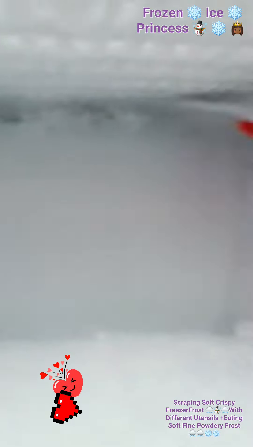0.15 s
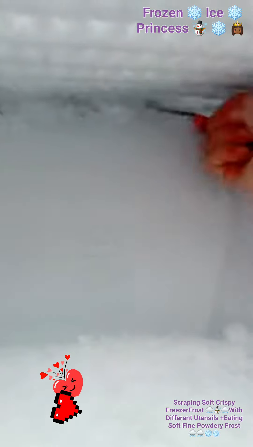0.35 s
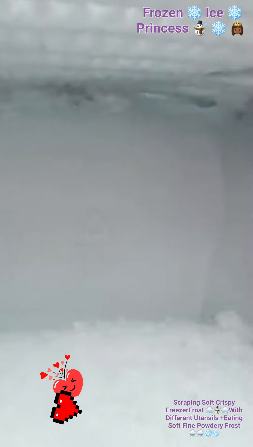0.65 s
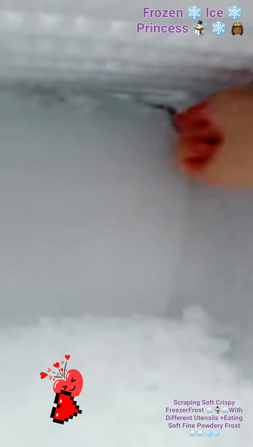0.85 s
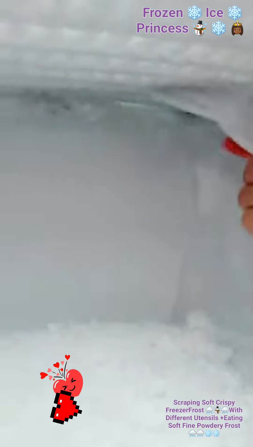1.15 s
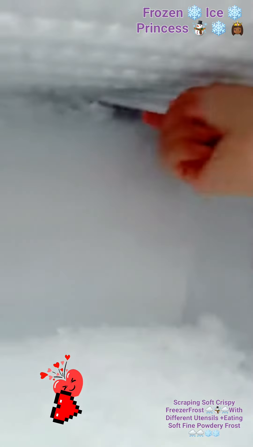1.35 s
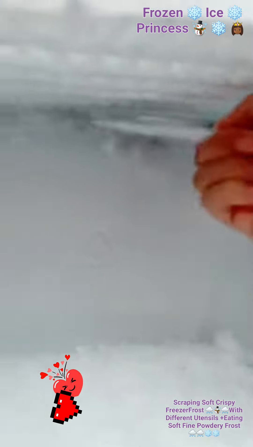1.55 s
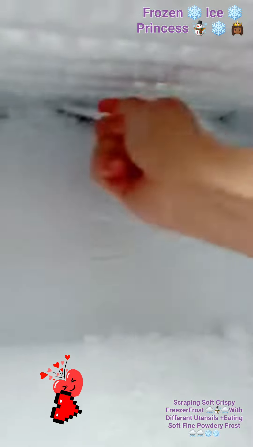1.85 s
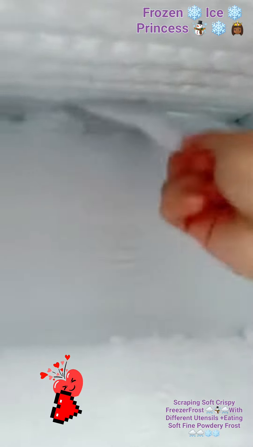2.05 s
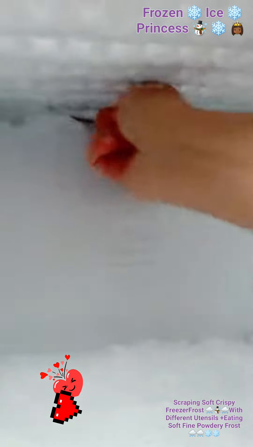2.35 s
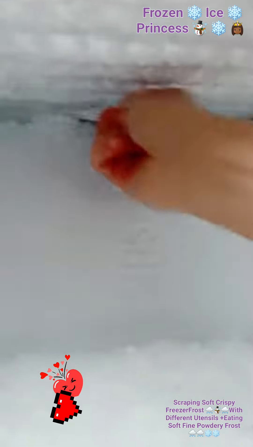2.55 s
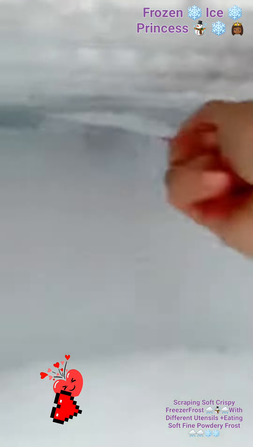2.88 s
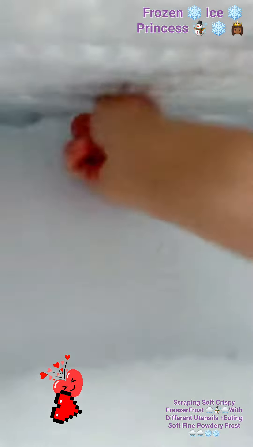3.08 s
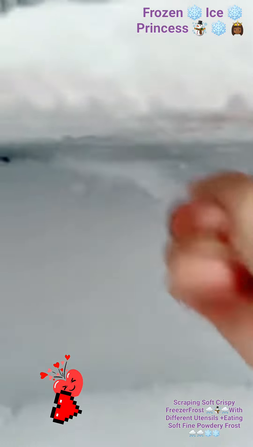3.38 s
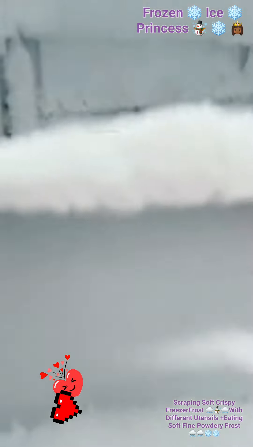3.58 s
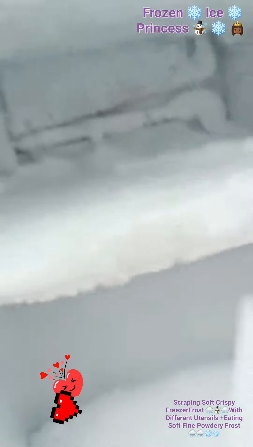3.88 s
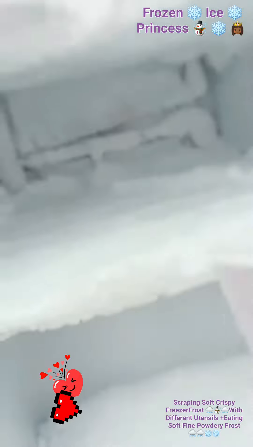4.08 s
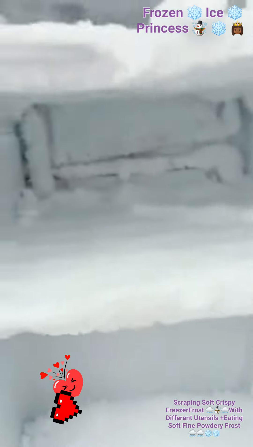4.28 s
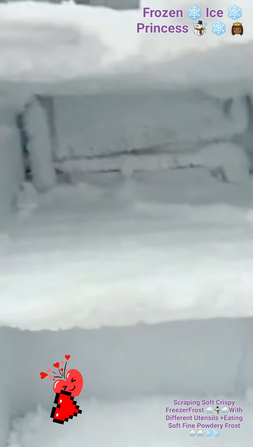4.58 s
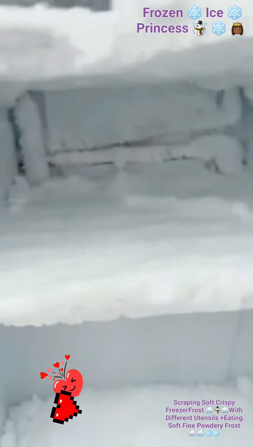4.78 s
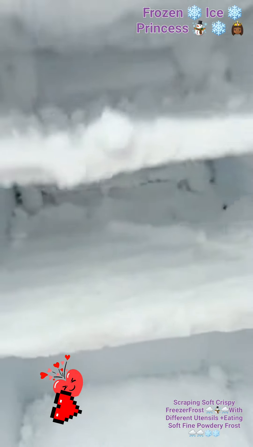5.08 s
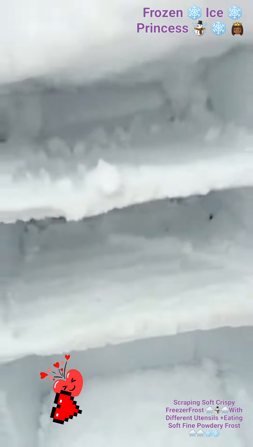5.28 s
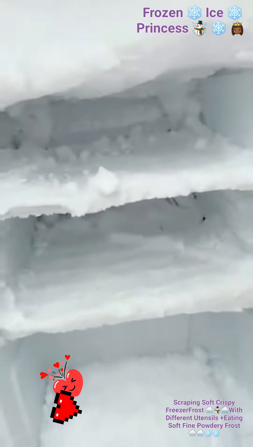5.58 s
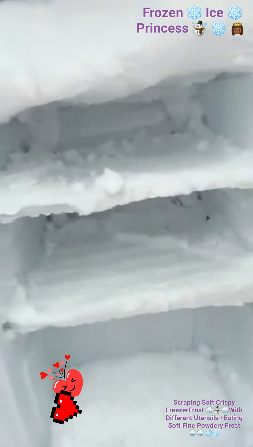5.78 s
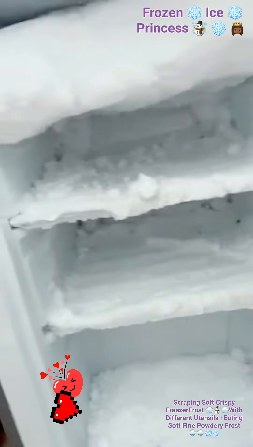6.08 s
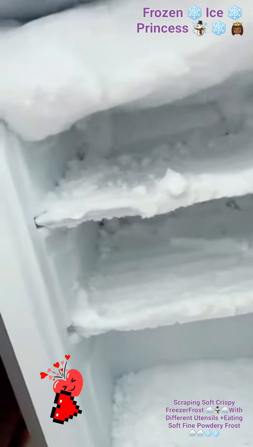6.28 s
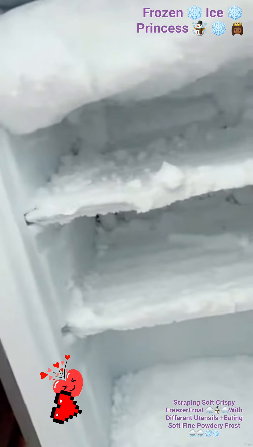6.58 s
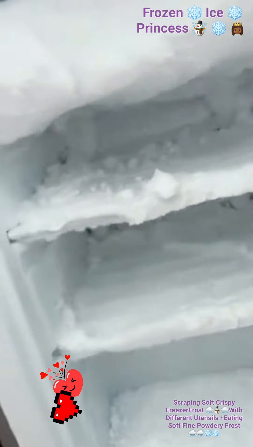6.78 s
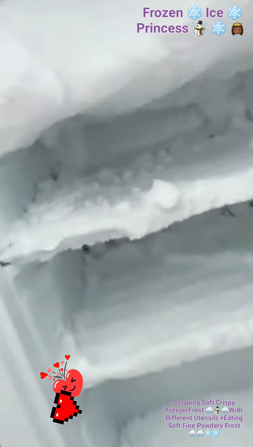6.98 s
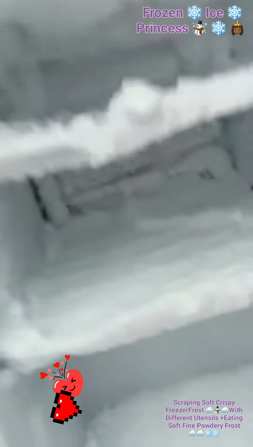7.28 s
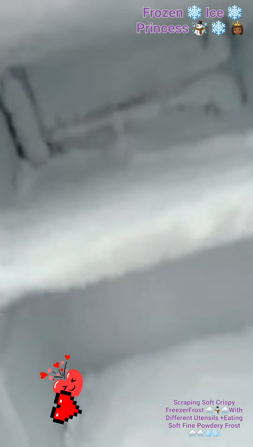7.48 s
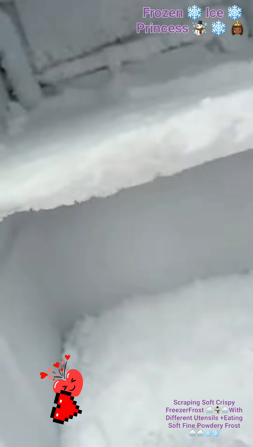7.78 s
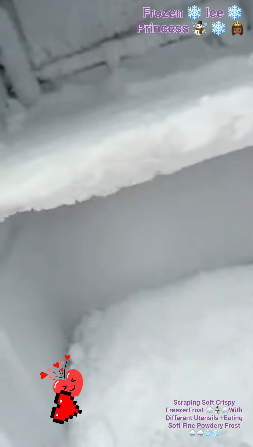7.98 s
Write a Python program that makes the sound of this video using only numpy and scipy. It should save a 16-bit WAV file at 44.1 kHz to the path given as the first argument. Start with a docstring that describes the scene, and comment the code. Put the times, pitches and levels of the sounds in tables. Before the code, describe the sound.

Close, bright scraping of freezer ice with hollow liner thumps, followed by a brief plastic squeak, sharp frozen cracks, soft rubbing and faint clicks.

```python
"""A blade scrapes frost off the back wall of a freezer in quick strokes, close to a phone, over a low hum.
Ice crystals snap in dense bursts and ring the blade; its drag drums the plastic liner, which also takes blows.
Then plastic squeaks as it sticks and slips, something soft like a sleeve brushes past and hollow plastic is
tapped. A frozen part of the cabinet cracks and grinds; light clicks and soft rubbing close the scene."""
import sys
import numpy as np
from scipy import signal
from scipy.fft import rfft, irfft
from scipy.io import wavfile

SR = 44100
rng = np.random.default_rng(int(sys.argv[2]) if len(sys.argv) > 2 else 0)


def log_audio(samples):
    """Write samples as a 16-bit WAV file to the path given in sys.argv[1]."""
    # one column per channel
    frames = np.atleast_2d(samples).T
    # limit to full scale, then quantise
    limited = np.clip(frames, -1, 1)
    pcm = np.round(limited * 32767).astype(np.int16)
    wavfile.write(sys.argv[1], SR, pcm)


N = 358958
TIME = np.arange(N) / SR
# Table levels are relative: the function that plays a table balances it against the other layers.


def undb(db):
    """Amplitude gain from decibels."""
    return 10 ** (np.asarray(db) / 20)


def unit(x):
    """Scale to rms 1."""
    return x / np.sqrt(np.mean(x ** 2))


def unit_energy(response):
    """Scale an impulse response to energy 1."""
    return response / np.linalg.norm(response)


def filtered(x, response):
    """Pass x through an impulse response."""
    return signal.fftconvolve(x, response)[:len(x)]


def low_cut(x, hz):
    """Steep high-pass."""
    return signal.sosfilt(signal.butter(4, hz, "high", fs=SR, output="sos"), x)


def colour(x, spectrum, size=4096):
    """Causal (minimum-phase) filter of unit energy shaped by (f/Hz, level/dB) points."""
    hz, db = np.transpose(spectrum)
    bins = np.maximum(np.arange(size // 2 + 1) * SR / size, 1)
    level_db = np.interp(np.log(bins), np.log(hz), db)
    cepstrum = irfft(np.log(undb(level_db)))
    # folding the cepstrum forward puts the energy as early as possible
    cepstrum[1:size // 2] *= 2
    cepstrum[size // 2 + 1:] = 0
    response = irfft(np.exp(rfft(cepstrum)))
    return filtered(x, unit_energy(response))


def gain_curve(table, axis):
    """Gain from one dB column of a table, silent outside its times."""
    columns = np.transpose(table)
    return undb(np.interp(TIME, columns[0], columns[axis], left=-200, right=-200))


def walk(rate):
    """Random wander through `rate` points a second, spread near 1."""
    return 1.2 * np.interp(TIME * rate, np.arange(N // 8), rng.standard_normal(N // 8))


def noise():
    """White noise of rms near 1."""
    return rng.standard_normal(N)


def grains(rate, spread_db, slip_rate, slip_db):
    """Tiny fractures of uneven size, `rate` a second, that bunch as the contact sticks and slips; rms 1."""
    hits = rng.random(N) < rate / SR
    signs = rng.choice([-1, 1], N)
    sizes = undb(spread_db * np.minimum(rng.exponential(size=N), 4))
    snaps = hits * signs * sizes
    return unit(snaps * undb(slip_db * walk(slip_rate)))


def fade(t, t60):
    """Exponential decay by 60 dB in t60 seconds, never quicker than 3 ms."""
    return np.exp(-np.log(1000) * t / max(t60, .003))


def ring(hz, t60):
    """Impulse response of one mode: a decaying sine."""
    t = TIME[:SR // 3]
    return np.sin(2 * np.pi * hz * t) * fade(t, t60)


def bursts(events, rise_s):
    """Envelope of short events (t/s, level/dB, t60/s): a fast rise, then each its own decay."""
    out = np.zeros(N)
    for s, db, t60 in events:
        part = out[int(s * SR):][:SR // 2]
        t = TIME[:len(part)]
        part += undb(db) * (1 - np.exp(-t / rise_s)) * fade(t, t60)
    return out


def contacts(events):
    """Gain of rubs (t/s, length/s, level/dB, growth/dB, arch/dB, attack/s, release/s) whose powers add."""
    shoulder = 0.15  # rounds the corners of each rub, as a share of its attack or release
    t, power = TIME[::16], 0
    for s, length, db, growth, arch, attack, release in events:
        before = np.maximum(s - t, 0) / max(attack, .001)
        after = np.maximum(t - s - length, 0) / max(release, .001)
        ramps = np.hypot(before + after, shoulder) - shoulder
        along = np.clip((t - s) / max(length, .001), 0, 1)
        hold_db = db - growth * (1 - along) - arch * (2 * along - 1) ** 2
        # attack and release each span about 30 dB
        power = power + undb(hold_db - 30 * np.minimum(ramps, 6)) ** 2
    return np.interp(TIME, t, np.sqrt(power))


def rubs(table, attack_s, release_s):
    """Gain of even rubs (t/s, length/s, level/dB) that share one attack and release."""
    return contacts((s, length, db, 0, 0, attack_s, release_s) for s, length, db in table)


def moving_echoes(x, lags_s, sway, rate):
    """Reflections off nearby surfaces whose paths keep changing, so their colour shifts."""
    echoes = sum(np.interp(TIME - lag * (1 + sway * walk(rate)), TIME, x) for lag in lags_s)
    return echoes / np.sqrt(len(lags_s))


def reflections(t60, low_hz):
    """Dense echoes: decaying noise of unit energy, then cut below low_hz."""
    t = TIME[:SR]
    echoes = rng.standard_normal(len(t)) * fade(t, t60) * (t > .001)
    return low_cut(unit_energy(echoes), low_hz)


# motor hum partials: f/Hz, rms level/dB before they waver
MOTOR_HUM = [(48.4, -55), (96.9, -56), (296, -67), (635, -66)]
# tone of the quiet room: f/Hz, level/dB
ROOM_TONE = [(20, -39), (45, 2), (70, -7.5), (105, -0.5), (150, -2), (220, -15.5), (450, -11.5), (640, -15),
             (800, -17.5), (2500, -20.5), (7000, -28), (15000, -40)]
ROOM_DB = -52


def background():
    """A motor hums on a few unsteady sines over the noise of the quiet room."""
    hum = 0
    for hz, db in MOTOR_HUM:
        tone = np.sqrt(2) * np.sin(2 * np.pi * hz * TIME + 0.2 * walk(9))
        hum = hum + undb(db + 2.0 * walk(3.14)) * tone
    air = colour(noise(), ROOM_TONE) * undb(ROOM_DB + walk(3.3))
    return hum + air


# a sleeve brushes past: t/s, length/s, level/dB
SLEEVE_BRUSHES = [(5.25, .08, -29.5), (8.0, .06, -47), (8.125, .02, -34)]
# the hand shifts its grip: t/s, length/s, level/dB
GRIP_SHIFTS = [(3.99, 0.22, -41), (4.295, 0.018, -36.5), (4.5, 0.56, -40), (5.66, 0.2, -37.5),
               (6.0, 0.64, -44.5), (7.48, 0.26, -48), (7.86, 0.035, -36.5)]
# friction tone of cloth, then of skin: f/Hz, level/dB
CLOTH_TONE = [(71, -50), (120, -0.5), (224, -8), (357, 1), (569, -9.5), (668, -8), (1200, -8.5),
              (1990, -7.5), (3360, 1.5), (3950, -2.5), (4950, -2.5), (6100, -18), (6960, -12),
              (7860, -20.5), (15000, -20.5)]
SKIN_TONE = [(120, -5), (250, -13), (450, -5.5), (800, -7), (1300, -1), (1900, -1.5), (2800, -4.5),
             (3800, -9), (7300, -14), (11000, -27), (15000, -22.5)]


def handling():
    """Fine friction grains of a sleeve and of the hand swell and fade softly."""
    cloth = colour(grains(rate=19000, spread_db=-1.5, slip_rate=200, slip_db=0.5), CLOTH_TONE)
    sleeve = cloth * rubs(SLEEVE_BRUSHES, attack_s=.15, release_s=0.15)
    skin = colour(grains(rate=9000, spread_db=0.5, slip_rate=47, slip_db=1.5), SKIN_TONE)
    grip = skin * rubs(GRIP_SHIFTS, attack_s=0.16, release_s=0.25)
    return undb(3.0) * sleeve + undb(-4.0) * grip


# soft tap on hollow plastic: t/s, level/dB, t60/s
SOFT_TAPS = [(5.663, -29, 0.17)]
# resonances of the hollow plastic: f/Hz, level/dB
HOLLOW_MODES = [(1400, -28), (1670, 2), (1900, -11), (2190, 2), (2740, 2), (2980, -9), (4400, -3)]


def tap():
    """A padded touch, a soft noise burst, rings a few resonances of hollow plastic."""
    push = noise() * bursts(SOFT_TAPS, rise_s=.0015)
    body = sum(undb(db) * ring(hz, t60=0.029) for hz, db in HOLLOW_MODES)
    return filtered(push, unit_energy(body))


# frozen plastic cracks: t/s, level/dB, t60/s, bright snap against the crack/dB
PLASTIC_CRACKS = [(6.125, -0.5, 0.034, -17), (6.317, -0.5, 0.029, -5.5), (6.521, -3.5, 0.041, -3),
                  (6.586, -8.5, 0.068, -3.5)]
# plastic grinds on ice: t/s, length/s, level/dB
ICE_GRINDS = [(4.613, 0.018, -22), (4.67, .03, -35), (6.137, 0.034, -22), (6.25, 0.03, -35),
              (6.314, 0.031, -19.5), (6.37, 0.083, -24), (6.488, 0.041, -22.5), (6.55, 0.043, -27.5),
              (6.612, 0.019, -18)]
# light clicks of handled plastic: t/s, level/dB, t60/s
PLASTIC_CLICKS = [(.073, -18, 0.045), (4.272, -16, 0.083), (4.323, -21, 0.084), (4.611, -12.5, 0.049),
                  (4.791, -21, 0.049), (4.811, -13.5, 0.031), (5.586, -32, 0.1), (7.322, -31.5, 0.019),
                  (7.793, -35, 0.08), (7.851, -31, 0.049), (8.091, -34, .09)]
# tone of the crack body, its bright snap, the grind and the click: f/Hz, level/dB
CRACK_TONE = [(80, -27), (300, 2), (750, -3.5), (1900, 5), (3000, -5.5), (6000, -18), (8500, -27),
              (15000, -29)]
SNAP_TONE = [(1500, -10), (3500, 4.5), (7500, 0.5), (10000, -11), (15000, -8)]
GRIND_TONE = [(50, -42), (120, -4), (180, -11.5), (270, -5), (385, 6.5), (570, -2), (780, 1), (1000, -0.5),
              (1350, -6), (1900, -2.5), (3000, -11.5), (7600, -26), (9000, -33.5), (15000, -38)]
CLICK_TONE = [(150, -5.5), (450, -12), (900, -10), (1400, 1), (2200, 5), (3300, -3), (6000, -6.5),
              (9000, -15), (15000, -22)]


def plastic():
    """Frozen plastic lets go with sharp cracks, grinds between them, and clicks when handled."""
    body = bursts([(s, db, t60) for s, db, t60, _ in PLASTIC_CRACKS], rise_s=0.00036)
    snap = bursts([(s, db + bright, t60) for s, db, t60, bright in PLASTIC_CRACKS], rise_s=0.00017)
    cracks = colour(noise() * body, CRACK_TONE) + undb(-1.5) * colour(noise() * snap, SNAP_TONE)

    # the cabinet shudders on after each grind
    press = rubs(ICE_GRINDS, attack_s=0.018, release_s=0.088)
    shudder = undb(-18) * rubs(ICE_GRINDS, attack_s=0.018, release_s=0.4)
    friction = colour(grains(rate=3100, spread_db=0.5, slip_rate=130, slip_db=1.5), GRIND_TONE)
    grind = friction * np.hypot(press, shudder)
    grind = grind + .5 * moving_echoes(grind, [.0013, .0029], sway=.15, rate=12)

    clicks = colour(noise() * bursts(PLASTIC_CLICKS, rise_s=0.0013), CLICK_TONE)
    return undb(-5) * cracks + undb(-1) * grind + undb(-3.5) * clicks


# rubbing plastic sticks and slips: t/s, mean f/Hz, level/dB, roughness (0 smooth, 1 chattering)
STICK_SLIP = [(4.492, 1133, -40, 0.65), (4.501, 1133, -23, 0.6), (4.518, 1207, -16.5, 0.5),
              (4.537, 1215, -18, 1.02), (4.552, 1142, -18.5, .6), (4.566, 1113, -13.5, 0.3),
              (4.6, 1088, -15, 0.33), (4.609, 1060, -38, 0.6), (4.62, 1020, -55, .5)]
SECOND_TONE_ABOVE_HZ, SECOND_TONE_DB = 360, -4.5  # joins the squeak when it chatters


def squeak():
    """A stick-slip tone rises, then sags; when it chatters, a second, higher tone and grit join it."""
    s, *columns = np.transpose(STICK_SLIP)
    hz, _, rough = (np.interp(TIME, s, column) for column in columns)
    jitter = .018 * rough * walk(400) + .007 * walk(150)
    phase = 2 * np.pi * np.cumsum(hz * (1 + jitter)) / SR
    overtones = 0
    for k, db in enumerate([-15, -20, -26], 2):
        overtones = overtones + undb(db + 4 * walk(90)) * np.sin(k * phase)
    upper = phase + 2 * np.pi * np.cumsum(SECOND_TONE_ABOVE_HZ + 25 * walk(90)) / SR
    second = np.sin(upper) + undb(-9) * np.sin(2 * upper) + undb(-12) * np.sin(upper + phase)
    grit_tone = [(700, -15.5), (1450, 1), (1800, -3), (2800, -6), (4500, -15.5), (8000, -20.5), (12000, -40)]
    grit = colour(noise(), grit_tone)
    tones = np.sin(phase) + overtones + undb(SECOND_TONE_DB) * rough * second
    sound = np.sqrt(2) * tones + undb(-2.5) * rough * grit
    return sound * gain_curve(STICK_SLIP, axis=2)


# blows on the liner: t/s, level/dB, centre of the modes that answer f/Hz, their spread/octaves
LINER_BLOWS = [(1.0003, 0.5, 900, 1.1), (1.216, -11.5, 150, 0.12), (1.234, -10, 149, 0.15),
               (2.58, -8.5, 150, 0.74), (2.201, -17, 149, 0.44), (3.399, -11.5, 111, 0.22),
               (4.629, -6.5, 960, 0.51), (4.635, -13.5, 114, 0.14)]
# modes of the liner, also drummed by the scraping: f/Hz, t60/s, level dragged/dB, level struck/dB
LINER_MODES = [(111.2, 0.82, -10, -31), (118.4, 0.24, -0.5, -13), (156, 0.16, 0.5, 2),
               (214.6, 0.046, -1, -28), (293.4, 0.067, -6.5, -34), (385.7, 0.54, -19, 5.5),
               (433, 0.13, -13.5, -52), (487.6, 0.21, -10, 1.5), (650, 0.2, -43, -2.5),
               (827, 0.083, -12, -6), (933, 0.18, -18, -20), (1340, 0.023, -10.5, 8.5),
               (1510, 0.087, -17, -9), (1899, 0.027, -16.5, 1.5)]


def blows():
    """Knocks on the liner; the place and softness of each decide which modes answer."""
    out = np.zeros(N)
    for s, level_db, centre, octaves in LINER_BLOWS:
        knock = 0
        for hz, t60, _, db in LINER_MODES:
            answer = np.exp(-(np.log2(hz / centre) / octaves) ** 2 / 2)
            knock = knock + undb(db) * answer * ring(hz, t60)
        # what strikes stays pressed on and damps the ring
        knock = knock * fade(TIME[:len(knock)], .3)
        out[int(s * SR):][:len(knock)] += undb(level_db) * knock / np.abs(knock).max()
    return out


# firm strokes: t/s, length/s, attack/s, crystal rasp level at the end/dB, its growth along the stroke/dB,
# powder against the rasp/dB, drag level on the liner/dB, boom level of the wall/dB
FIRM_STROKES = [ (0.319, 0.29, 0.0032, -20, 4.5, 0.5, -24, -24.5),
                (1.089, 0.021, 0.14, -19, 3.5, 0, -26.5, -25.5),
                (1.158, 0.025, 0.037, -21.5, 0.5, -1, -20.5, -22.5),
                (1.534, 0.15, 0.054, -18.5, 4, -1.5, -23.5, -24.5),
                (1.978, 0.21, .004, -18, 8, -6, -27.5, -22),
                (2.425, 0.13, .004, -18, 8.5, -6.5, -24.5, -22.5),
                (2.881, .03, 0.034, -18.5, 4.5, -5.5, -21, -22),
                (3.315, 0.076, 0.006, -19.5, -2.5, -6.5, -23.5, -24), ]
# the blade grazes the frost between strokes: closest touch t/s, rise and fall/s, rasp level/dB,
# powder against the rasp/dB, drag level/dB, boom level/dB
LIGHT_GRAZES = [ (0.0, 0.22, -37, -5, -40.5, -36.5), (0.798, 0.086, -24.5, -7.5, -26.5, -28.5),
                (1.002, 0.073, -46, 8, -29.5, -29), (1.398, 0.19, -30.5, -6.5, -37, -33),
                (1.49, 0.051, -39, -1, -40, -35), (1.868, 0.073, -37, -7, -51, -55),
                (2.301, 0.074, -23.5, -10, -27, -32), (2.71, 0.51, -35.5, -15, -35.5, -34),
                (2.813, 0.077, -33.5, -2, -39, -29.5), (3.02, 0.36, -36.5, -23, -35, -36),
                (3.139, 0.072, -39, -11, -34, -38), (3.558, 0.23, -31.5, -17, -35.5, -37),
                (3.664, 0.058, -35.5, -8, -40.5, -34.5), ]
# loosened crumbs keep trickling while the work lasts: t/s, length/s, level/dB
CRUMB_TRICKLE = [(0.0, 3.9, -54)]
CRUMB_POWDER_DB, CRUMB_LINER_DB, CRUMB_WALL_DB = 0, -8, 2.5  # against the crumbs' rasp
# along a stroke the blade digs in, so drag and boom grow; powder follows its speed, weaker at both ends
DRAG_GROWS_DB, BOOM_GROWS_DB, POWDER_ARCH_DB = 9.5, 8.5, 5
# time to fall by about 30 dB once the blade lifts
RASP_RELEASE_S, POWDER_RELEASE_S, DRAG_RELEASE_S, BOOM_RELEASE_S = 0.078, 0.054, 0.14, .17
BOOM_LAG_S = 0.012  # the wall swings on this long after the blade lifts


def blade_contact():
    """How hard strokes, grazes and crumbs drive rasp, powder, liner and wall, over patchy frost."""
    rasp, powder, drag, boom = layers = [], [], [], []
    for s, length, attack, db, growth, fine, drag_db, boom_db in FIRM_STROKES:
        rasp.append((s, length, db, growth, 0, attack, RASP_RELEASE_S))
        powder.append((s, length, db + fine, 0, POWDER_ARCH_DB, attack, POWDER_RELEASE_S))
        drag.append((s, length, drag_db, DRAG_GROWS_DB, 0, attack, DRAG_RELEASE_S))
        boom.append((s, length + BOOM_LAG_S, boom_db, BOOM_GROWS_DB, 0, attack, BOOM_RELEASE_S))
    for s, ramp, db, fine, drag_db, boom_db in LIGHT_GRAZES:
        for layer, level in zip(layers, (db, db + fine, drag_db, boom_db)):
            layer.append((s, 0, level, 0, 0, ramp, ramp))
    crumbs = rubs(CRUMB_TRICKLE, attack_s=.01, release_s=0.22) * undb(4.4 * walk(24.63))
    shares = (0, CRUMB_POWDER_DB, CRUMB_LINER_DB, CRUMB_WALL_DB)
    patchy_frost = undb(1.4 * walk(70))
    return [patchy_frost * np.hypot(contacts(layer), undb(db) * crumbs)
            for layer, db in zip(layers, shares)]


# the edge bites into the crust: t/s, level/dB, t60/s
CRUST_BITES = [(0.321, -4, 0.025), (0.732, -16, .04), (0.9455, -1.5, 0.03), (.965, -1.5, 0.023),
               (.988, -5.5, 0.11), (1.086, -9, 0.12), (1.364, -16, .05), (1.457, -12, 0.061),
               (1.981, -10, 0.047), (2.002, -7.5, 0.065), (2.054, -3, .04), (2.083, -4, 0.024),
               (2.427, -18, 0.017), (2.858, -15, 0.07), (3.106, -19.5, .1), (3.204, -18, 0.034),
               (3.317, -12, 0.04), (3.651, -12.5, 0.033)]
# just before each bite the edge sticks and the rasp drops
STICK_S, STICK_DB = 0.021, -4.5


def sticking():
    """Gain that sinks as the edge catches in the crust and jumps back at the bite."""
    caught = 0
    for s, _, _ in CRUST_BITES:
        caught = caught + np.interp(TIME, [s - STICK_S, s - STICK_S / 2, s], [0, 1, 1], right=0)
    return undb(STICK_DB * np.minimum(caught, 1))


# tone of the blade, the fine powder and the dragged liner: f/Hz, level/dB
BLADE_TONE = [(900, -20.5), (2000, -12.5), (2700, -2), (4800, -0.5), (5500, 2), (6000, -0.5), (6500, 4.5),
              (7200, -5), (8200, -11.5), (9300, -10.5), (10500, -37), (14000, -28.5)]
POWDER_TONE = [(5000, -50), (8500, -1.5), (9400, 2), (10000, -1.5), (11500, -1), (13000, 2), (16000, 0)]
LINER_TONE = [(150, -24), (300, 6), (500, 5), (700, -3.5), (1300, -3), (1900, -14.5), (2800, -7),
              (5000, -25)]
# modes of the blade: f/Hz, t60/s (played as 0.003 where shorter), level/dB
BLADE_MODES = [(2540, 0.019, -18), (2970, 0.22, -21), (3660, 0.0028, -14.5), (4260, 0.028, -14),
               (5570, 0.0021, -14.5), (6110, 0.03, -2), (6960, 0.016, -5.5), (7460, 0.0028, -1)]


def scraping():
    """Crystals snap against the ringing blade, powder hisses, and the drag shakes the liner."""
    rasp, powder, drag, boom = blade_contact()
    sliding = sticking()
    bite_grains = grains(rate=15000, spread_db=5.5, slip_rate=164.6, slip_db=1.0)
    bite = bursts(CRUST_BITES, rise_s=0.0002) * bite_grains

    crackle = grains(rate=11000, spread_db=2.5, slip_rate=260, slip_db=1.7)
    crystals = crackle * rasp * sliding + undb(-10.5) * bite
    blade = undb(-5.5) * colour(crystals, BLADE_TONE)
    # the point of contact wanders along the edge and favours now one mode, now another
    for hz, t60, db in BLADE_MODES:
        drive = crystals * undb(db - 12.5 + 2.6 * walk(45))
        blade += filtered(drive, unit_energy(ring(hz, t60)))

    hiss = grains(rate=25000, spread_db=4.0, slip_rate=270, slip_db=-1.5) * powder * sliding
    dust = colour(undb(-2.0) * hiss + undb(-14.5) * bite, POWDER_TONE)

    scrub = grains(rate=2500, spread_db=2.5, slip_rate=150, slip_db=2.5) * drag * sliding
    liner = colour(undb(1.0) * scrub + undb(-19) * bite, LINER_TONE)

    modes = sum(undb(db) * ring(hz, t60) / np.sqrt(t60) for hz, t60, db, _ in LINER_MODES)
    shoves = grains(rate=1500, spread_db=1.0, slip_rate=60, slip_db=2.5) * boom
    wall = low_cut(filtered(undb(2.5) * shoves, unit_energy(modes)), hz=99)

    # hand and shelf throw the crunch back from a few centimetres
    crunch = blade + liner
    thrown_back = .6 * moving_echoes(crunch, [.0005, .0011, .0017], sway=.12, rate=14)
    return crunch + thrown_back + dust + wall


PORT_LAG_S = .00001  # plastic and tap come from one side and reach the left port this much later


def scene():
    """Sounds echo in cabinet and room; only short waves differ much between the two microphone ports."""
    aside = plastic() + tap()
    near = scraping() + low_cut(blows(), hz=71.4) + aside + handling()
    direct = near + squeak()
    cabinet = undb(-8) * filtered(near, reflections(0.086, low_hz=360))
    room = undb(-22) * filtered(direct, reflections(0.71, low_hz=260))
    mid = undb(-1.72) * (direct + cabinet) + room + background()
    # each port catches its own changing share of the reflections
    scatter = moving_echoes(mid, [.0006], sway=.3, rate=20)
    short_waves = low_cut(low_cut(scatter, hz=4840), hz=4840)
    side = undb(-4.0) * short_waves + undb(-44.0) * scatter
    side = side + (np.interp(TIME - PORT_LAG_S, TIME, aside) - aside) / 2
    return np.array([mid + side, mid - side])


TOP_HZ = 15850


def record(dry):
    """The phone rounds the highest peaks and cuts the top."""
    rounded = np.tanh(0.73 * dry) / 0.67
    return signal.sosfilt(signal.ellip(10, .2, 80, TOP_HZ, fs=SR, output="sos"), rounded)


dry = scene()
out = record(dry)
log_audio(out)
```